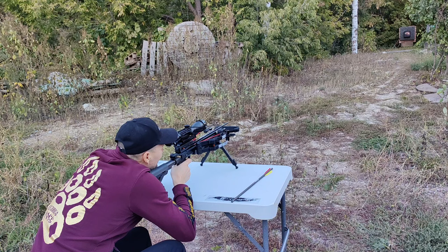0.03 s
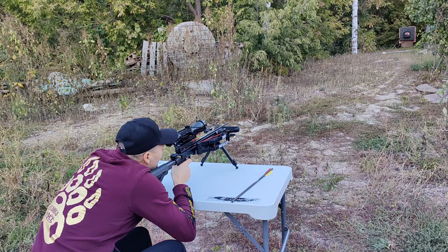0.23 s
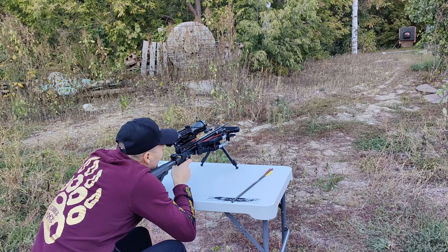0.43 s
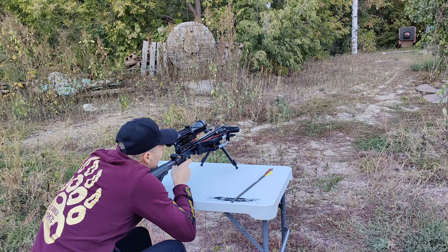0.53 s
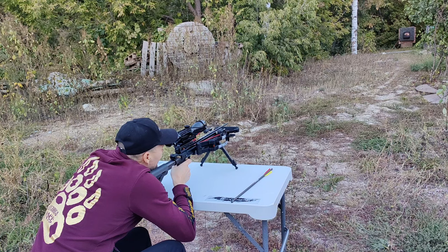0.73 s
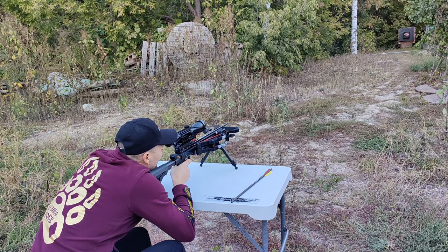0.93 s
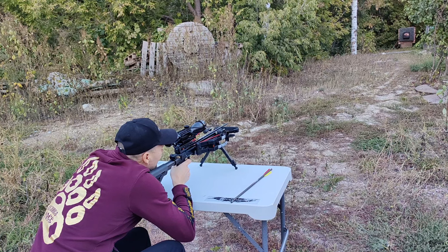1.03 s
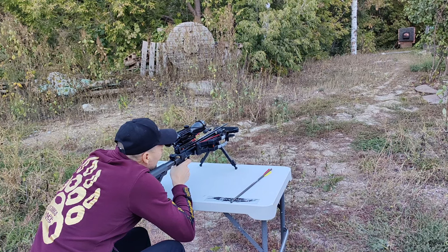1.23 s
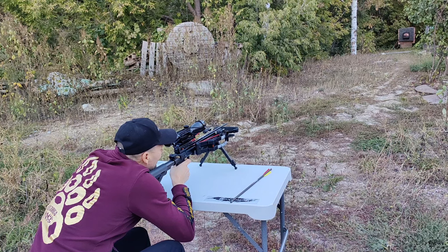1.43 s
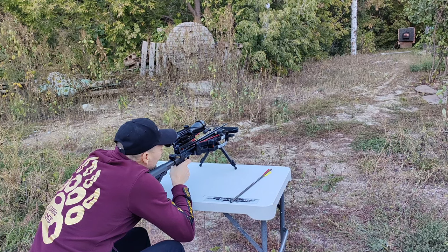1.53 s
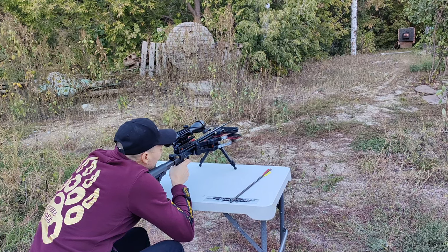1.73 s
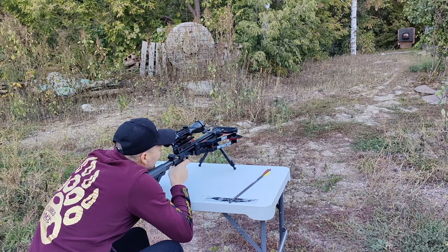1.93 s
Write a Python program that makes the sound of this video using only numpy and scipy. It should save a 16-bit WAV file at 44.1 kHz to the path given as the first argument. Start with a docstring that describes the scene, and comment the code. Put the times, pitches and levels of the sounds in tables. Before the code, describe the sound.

Nearly two seconds of soft outdoor hiss with faint low swells, then a close crossbow release: latch click, violent string snap, rattling frame and low thrum, with a faint scattered wash from the ground and bushes.

```python
"""A click, a sharp crack and a clattering, humming decay: a crossbow is fired from a table.
It stands in a quiet clearing, about two metres from the microphones; far hiss and a swelling low rumble lie behind.
Shaped noise makes the latch click, string rush, string blows, joint buzz, table clunk and scatter from the ground.
Decaying sines make the knock, frame, fittings, limbs and string; a sine of wandering pitch makes the swells."""
import sys
import numpy as np
from scipy import signal
from scipy.fft import rfft, irfft
from scipy.io import wavfile
from scipy.ndimage import uniform_filter1d

SR = 44100
rng = np.random.default_rng(int(sys.argv[2]) if len(sys.argv) > 2 else 0)


def transcribe(u):
    """Save the signal u as a 16-bit wav file named by the first command-line argument.

    u: samples, shape (n,) or (channels, n), limited to [-1, 1]; the rate is SR.
    q: integer samples, one column per channel.
    """
    v = np.clip(np.atleast_2d(u).T, -1, 1)
    q = np.round(v * 32767).astype(np.int16)
    wavfile.write(sys.argv[1], SR, q)


N = 88200

# Colours give relative level per Hz; *_DB settings set the level of a whole layer.
# far hiss: (frequency [Hz], left level [dB], right level [dB])
AIR_COLOUR = [(24.3, -23, -20), (50, -6, 0), (94, -1.5, 8), (200, 1.5, -4), (432, -1, -0.5),
              (1110, -4.5, -3.5), (1980, -8, -8), (3470, -12, -7), (4800, -19.5, -13), (7050, -23, -18.5),
              (7800, -27, -25), (10200, -52, -69), (15000, -51, -55)]
# part of the hiss common to both microphones: (frequency [Hz], share [0-1])
AIR_SHARED = [(60, 0.2), (150, 0.55), (300, 0.33), (1200, 0.44), (2500, 0.6), (5000, 0.4), (7000, 0.14)]
AIR_DB, AIR_LAG_S = -61.5, 0.00044
# low rumble: (frequency [Hz], level [dB])
RUMBLE_COLOUR = [(50, -29.5), (95, -5), (140, -1), (180, -10.5), (230, -6.5), (400, -20.5), (1000, -55)]
# its swells: (time of the top [s], half length to 1/e [s], level [dB])
SWELLS = [(0.446, .018, 2), (0.599, .012, -5.5), (.795, 0.031, 1), (0.909, 0.025, 1), (1.222, 0.055, -4),
          (1.351, 0.023, -4), (1.701, 0.023, -0.5)]
DRONE_HZ, DRONE_WANDER_HZ, SWELL_DB, RUMBLE_DB = 146, 14.27, -58.5, -67

# scatter from ground and bushes: (frequency [Hz], level [dB])
SCATTER_COLOUR = [(150, 1), (500, -5), (1000, 2), (2200, -3), (3500, -4.5), (6000, 2.5), (9000, 0),
                  (11000, -8), (15500, -11)]
SCATTER_S, SCATTER_DB, SCATTER_RISE_S, SCATTER_HOLD_S = 1.92, -38.5, 0.0071, 0.031
SCATTER_SPLIT_HZ, SCATTER_T60_S, SCATTER_TREBLE_T60_S, SCATTER_PATCHY_DB = 9000, 0.38, 0.24, 2

# small metal fittings chink: (time [s], level [dB])
RATTLES = [(1.9181, 8.5), (1.937, -12), (1.9527, -23), (1.965, -10), (1.9755, -7)]
# their ring: (frequency [Hz], level [dB], t60 [s], left over right [dB])
FITTINGS = [(2440, 1.5, 0.098, 2), (3040, -7, 0.085, -10), (3998, 1, 0.11, -1), (4830, -22, 0.071, -10),
            (5000, -4, .12, -10), (6400, -17, 0.065, -2), (6700, -11, 0.12, -19), (6850, -21, 0.087, -1),
            (9260, -5, 0.099, 12)]
FITTINGS_DB = -43.5

# limbs and string swing: (frequency [Hz], level [dB], t60 [s])
LIMBS = [(147, -16.3, .26), (163.5, -16.8, .26), (217, 0, .054), (235.5, -7.2, .144), (291, -11.9, .28),
         (335, -23, .28)]
LIMBS_S, LIMBS_DB, LIMBS_RISE_S = 1.9123, -10, 0.02

# the latch lets go: (time [s], level [dB])
LATCH_CLICKS = [(1.9038, -11.5), (1.9060, 1)]
# its click: (frequency [Hz], left level [dB], right level [dB])
LATCH_COLOUR = [(100, -10, -21), (300, -8, -25), (650, -22, -5.5), (1300, -5, -11), (2190, 10.5, 0),
                (2700, -6, -3), (3800, -2, 2), (5000, -6.5, -1.5), (7600, 6.5, -1), (10100, -3.5, -18),
                (15500, -1.5, -8)]
LATCH_DB, LATCH_RISE_S, LATCH_HOLD_S, LATCH_T60_S = -19.5, 0.00032, 0.00046, 0.014
# dull knock of the release, on the left: (frequency [Hz], level [dB], t60 [s], left over right [dB])
KNOCK = [(138, -2, 0.029, 18.5), (288, -7.5, 0.024, 20)]
KNOCK_S, KNOCK_DB = 1.9058, -27.5
# string rushing along the rail: (frequency [Hz], level [dB])
RUSH_COLOUR = [(200, -16), (700, -8), (2000, -1), (6000, -1), (9000, -3.5), (15500, -34)]
RUSH_DB, RUSH_RISE_S, RUSH_HOLD_S, RUSH_T60_S = -30.5, 0.0016, 0.004, 0.066

# the string meets its stops and rebounds: (time [s], level [dB])
BLOWS = [(1.9163, -6.5), (1.9179, 0.5), (1.9208, -5), (1.9261, -8.5), (1.9318, -9)]
# crack of each blow: (frequency [Hz], level [dB])
CRACK_COLOUR = [(200, -36), (700, -8.5), (1500, 0.5), (2700, 1), (3300, -11), (5000, 1), (7500, -6.5),
                (10500, -18.5), (15500, -21)]
CRACK_DB, CRACK_RISE_S, CRACK_HOLD_S, CRACK_T60_S = -19.5, 0.0002, 0.00049, 0.028
# frame, rail and cams ring: (frequency [Hz], level [dB], t60 [s], left over right [dB])
FRAME = [(660, -10, .12, 0), (836, -7, .115, 1), (961, -9, .08, 1), (1030, -9, .09, 1), (1095, -15, .15, 1),
         (1219, -8, .06, 1), (1362, -7, .08, 0), (1653, -1, .062, -3), (2023, -2, .065, 1),
         (2122, -2, .072, 0), (2302, -7, .06, -1), (2672, -.5, .055, -3), (2832, -1, .055, -3),
         (2985, -5, .05, -2)]
FRAME_S, FRAME_DB, FRAME_RISE_CYCLES, FRAME_DELAY_CYCLES = 1.9135, -18.5, 11.3, 4
# the frame's joints buzz: (frequency [Hz], level [dB])
BUZZ_COLOUR = [(300, -5.5), (480, -6.5), (650, -1), (1300, -1), (1550, -2.5), (1850, 1.5), (2400, -6),
               (3000, -3.5), (3500, -11), (7000, -25), (15500, -25)]
BUZZ_S, BUZZ_DB, BUZZ_RISE_S, BUZZ_HOLD_S, BUZZ_T60_S = 1.916, -28, 0.0052, 0.01, 0.1
# stock and bipod clunk on the table: (frequency [Hz], level [dB])
CLUNK_COLOUR = [(300, -14), (450, -9), (650, 2), (900, 1.5), (1200, -6.5), (2000, -14), (4000, -33)]
CLUNK_S, CLUNK_DB, CLUNK_RISE_S, CLUNK_HOLD_S, CLUNK_T60_S = 1.922, -33, 0.004, 0.019, 0.087

# the recorder's own hiss: (frequency [Hz], level [dB])
HISS_COLOUR = [(1000, 0), (15000, 0)]
HISS_DB, TOP_HZ = -86.5, 15300
# around and above APART_HZ the two microphones hear the bow's noise less and less alike
APART_HZ, BOW_LAG_S, LOW_CUT_HZ = 4400, 0.00007, 110


def amp(db):
    """Decibels to gain."""
    return 10 ** (np.asarray(db) / 20)


def unit(x):
    """Scale to rms 1."""
    return x / np.sqrt(np.mean(x ** 2))


def pan(db):
    """Left and right gains for a level difference, left over right."""
    return amp(np.array([[db], [-db]]) / 2)


def low_cut(x):
    """Take away the deep bass, which a small bow hardly radiates."""
    return signal.sosfilt(signal.butter(2, LOW_CUT_HZ, "high", fs=SR, output="sos"), x)


def noise(colour, shared, lag_s=0):
    """Coloured stereo noise; the shared part is common to both sides and reaches the right later."""
    hz = np.fft.rfftfreq(N, 1 / SR)
    points = np.array(colour, float)
    # left is the first level column, right the last; they coincide in a two-column table
    gain = amp([np.interp(np.log(hz + 1), np.log(points[:, 0]), points[:, k]) for k in (1, -1)])
    white = rfft(rng.standard_normal((3, N)))
    shared = np.clip(shared, 0, 1)
    common = white[2] * np.exp(-2j * np.pi * hz * np.array([[0], [lag_s]]))
    mixed = np.sqrt(shared) * common + np.sqrt(1 - shared) * white[:2]
    return unit(irfft(gain * mixed, N))


def near_noise(colour):
    """Noise from the bow: no deep bass, alike on both sides in the lows, less so in the treble."""
    shared = 1 / (1 + (np.fft.rfftfreq(N, 1 / SR) / APART_HZ) ** 2)
    return low_cut(noise(colour, shared, BOW_LAG_S))


def build_up(start, rise):
    """A push that takes some time to come to full force."""
    return np.clip((np.arange(N) / SR - start) / rise, 0, 1)


def envelope(start, rise, hold, t60):
    """Rise, hold and exponential fall."""
    age = np.arange(N) / SR - start
    fall = np.exp(-np.log(1000) * np.maximum(age - rise - hold, 0) / t60)
    return build_up(start, rise) * fall


def ring(start, hz, t60):
    """One struck mode: a sine that dies exponentially."""
    age = np.arange(N) / SR - start
    out, on = np.zeros(N), age > 0
    out[on] = np.sin(2 * np.pi * hz * age[on]) * np.exp(-np.log(1000) * age[on] / t60)
    return out


def struck(start, modes):
    """Modes struck at once, reaching the right microphone slightly later."""
    out = 0
    for hz, db, t60, side in modes:
        both = np.array([ring(start, hz, t60), ring(start + BOW_LAG_S, hz, t60)])
        out = out + amp(db) * pan(side) * both
    return out


def far_hiss():
    """Smooth distant hiss, partly common to both microphones and later on the right."""
    shared = np.interp(np.fft.rfftfreq(N, 1 / SR), *np.array(AIR_SHARED).T)
    return amp(AIR_DB) * noise(AIR_COLOUR, shared, AIR_LAG_S)


def low_rumble():
    """Steady low noise, with brief droning swells of wandering pitch."""
    t = np.arange(N) / SR
    swell = sum(amp(db) * np.exp(-((t - top) / half) ** 2) for top, half, db in SWELLS)
    wander = unit(uniform_filter1d(rng.standard_normal(N), size=900))  # about 20 ms
    drone_hz = DRONE_HZ + DRONE_WANDER_HZ * wander
    drone = unit(np.sin(2 * np.pi * np.cumsum(drone_hz) / SR))
    rumble = noise(RUMBLE_COLOUR, shared=0.96)
    return amp(RUMBLE_DB) * rumble + amp(SWELL_DB) * swell * drone


def scatter():
    """Ground and bushes return a faint, patchy wash whose treble dies first."""
    wash = noise(SCATTER_COLOUR, shared=0.25)
    body = signal.sosfiltfilt(signal.butter(2, SCATTER_SPLIT_HZ, fs=SR, output="sos"), wash)
    treble = wash - body
    unevenness = unit(uniform_filter1d(rng.standard_normal(N), size=90))  # about 2 ms
    patches = amp(SCATTER_PATCHY_DB * unevenness)
    body_fade = envelope(SCATTER_S, SCATTER_RISE_S, SCATTER_HOLD_S, SCATTER_T60_S)
    treble_fade = envelope(SCATTER_S, SCATTER_RISE_S, SCATTER_HOLD_S, SCATTER_TREBLE_T60_S)
    return amp(SCATTER_DB) * patches * (body_fade * body + treble_fade * treble)


def rattle():
    """Small metal parts chink as the bow shakes, each time ringing in the same modes."""
    return amp(FITTINGS_DB) * sum(amp(db) * struck(s, FITTINGS) for s, db in RATTLES)


def limbs():
    """Limbs and string thump and swing on; their close modes beat in a short thrum."""
    swing = sum(amp(db) * ring(LIMBS_S, hz, t60) for hz, db, t60 in LIMBS)
    return amp(LIMBS_DB) * build_up(LIMBS_S, LIMBS_RISE_S) * swing


def latch():
    """The sear ticks, then the latch flies open with a click and a dull knock."""
    pulses = sum(amp(db) * envelope(s, LATCH_RISE_S, LATCH_HOLD_S, LATCH_T60_S) for s, db in LATCH_CLICKS)
    clicks = pulses * near_noise(LATCH_COLOUR)
    return amp(LATCH_DB) * clicks + amp(KNOCK_DB) * struck(KNOCK_S, KNOCK)


def string_rush():
    """The string rushes down the rail from the moment of release, a little to the right."""
    release_s = LATCH_CLICKS[-1][0]
    rush = envelope(release_s, RUSH_RISE_S, RUSH_HOLD_S, RUSH_T60_S) * near_noise(RUSH_COLOUR)
    return amp(RUSH_DB) * pan(-3.5) * rush


def frame():
    """The slam sets frame, rail and cams ringing; low modes start later and build more slowly."""
    out = 0
    for mode in FRAME:
        hz = mode[0]
        start = FRAME_S + FRAME_DELAY_CYCLES / hz
        out = out + build_up(start, FRAME_RISE_CYCLES / hz) * struck(start, [mode])
    return amp(FRAME_DB) * out


def joint_buzz():
    """The frame's joints buzz after the slam as a short burst of noise."""
    fade = envelope(BUZZ_S, BUZZ_RISE_S, BUZZ_HOLD_S, BUZZ_T60_S)
    return amp(BUZZ_DB) * fade * near_noise(BUZZ_COLOUR)


def table_clunk():
    """Stock and bipod clunk on the table a moment later, a duller burst of noise."""
    fade = envelope(CLUNK_S, CLUNK_RISE_S, CLUNK_HOLD_S, CLUNK_T60_S)
    return amp(CLUNK_DB) * fade * near_noise(CLUNK_COLOUR)


def string_blows():
    """The string cracks against its stops and rebounds, each blow a steep burst of noise."""
    pulses = sum(amp(db) * envelope(s, CRACK_RISE_S, CRACK_HOLD_S, CRACK_T60_S) for s, db in BLOWS)
    return amp(CRACK_DB) * pan(1.5) * pulses * near_noise(CRACK_COLOUR)


def scene():
    """The shot in the clearing; the bow's snap loses its deep bass, while the limbs' thrum and the background
    keep theirs."""
    background = far_hiss() + low_rumble()
    slam = frame() + joint_buzz() + table_clunk() + string_blows()
    snap = low_cut(scatter() + rattle() + latch() + string_rush() + slam)
    return background + limbs() + snap


def record(dry):
    """The recorder adds a trace of hiss, the same on both sides, and cuts the top."""
    hiss = amp(HISS_DB) * noise(HISS_COLOUR, shared=1)
    return signal.sosfilt(signal.ellip(8, 0.2, 70, TOP_HZ, fs=SR, output="sos"), dry + hiss)


dry = scene()
out = record(dry)
transcribe(out)
```